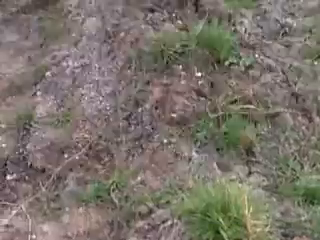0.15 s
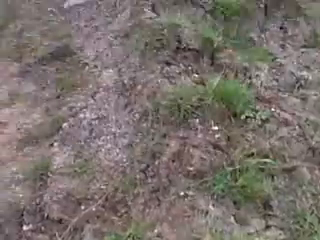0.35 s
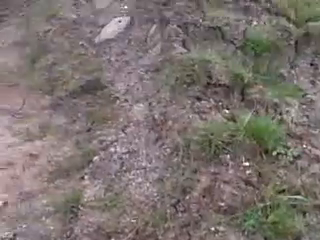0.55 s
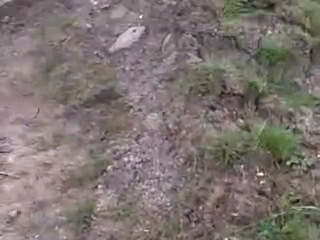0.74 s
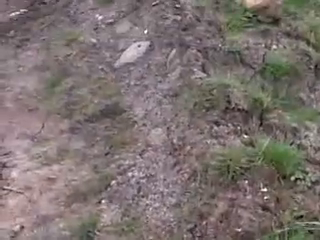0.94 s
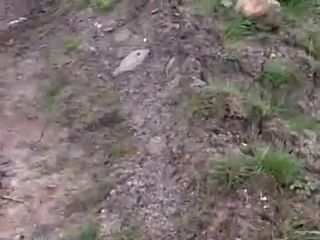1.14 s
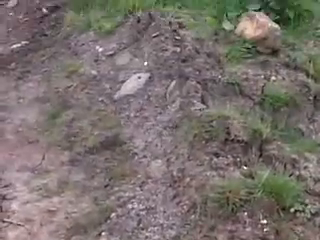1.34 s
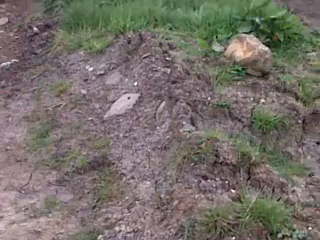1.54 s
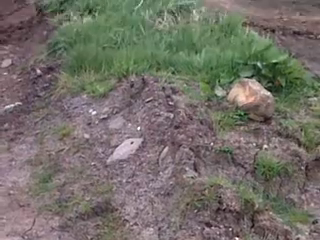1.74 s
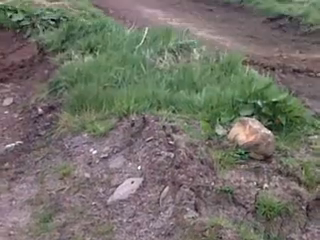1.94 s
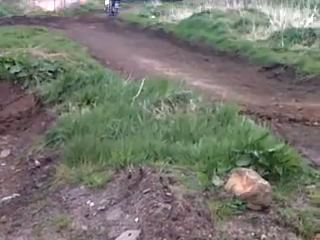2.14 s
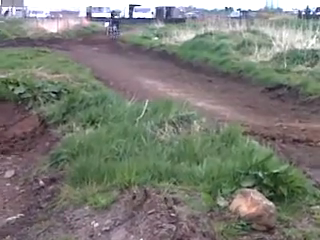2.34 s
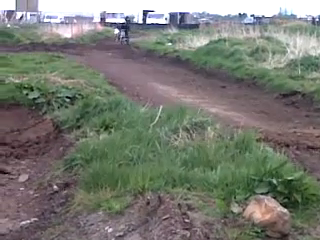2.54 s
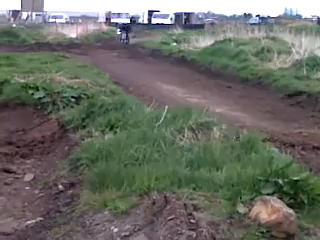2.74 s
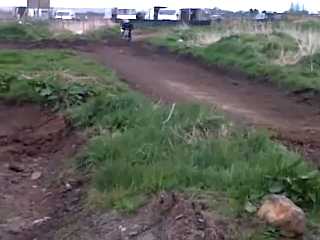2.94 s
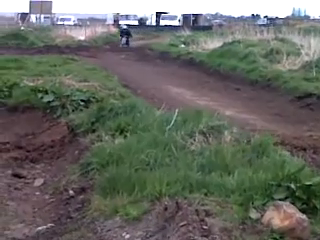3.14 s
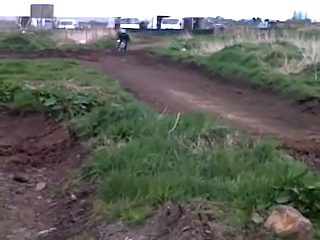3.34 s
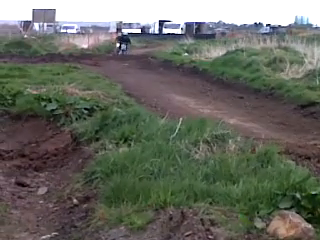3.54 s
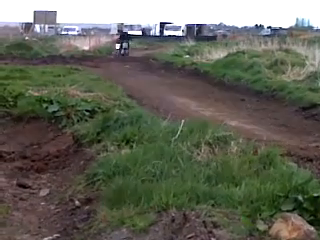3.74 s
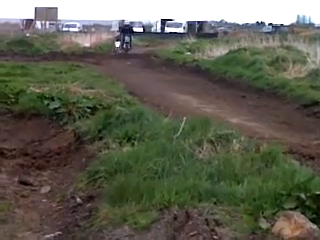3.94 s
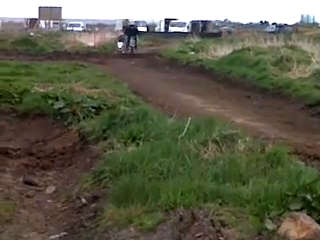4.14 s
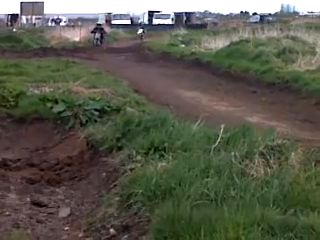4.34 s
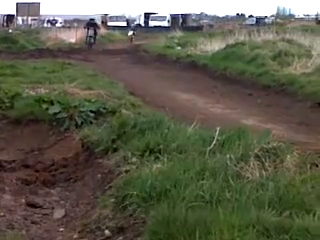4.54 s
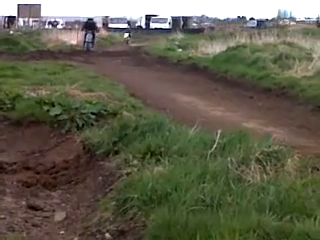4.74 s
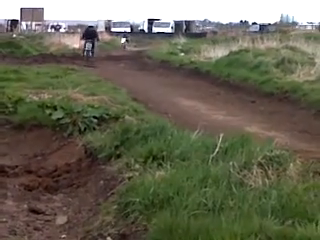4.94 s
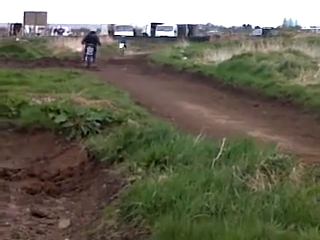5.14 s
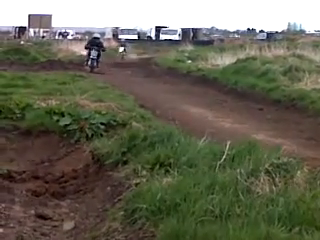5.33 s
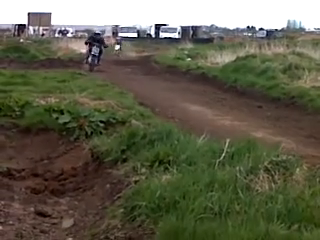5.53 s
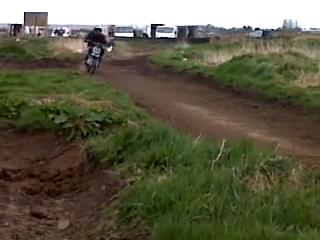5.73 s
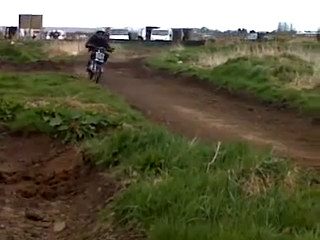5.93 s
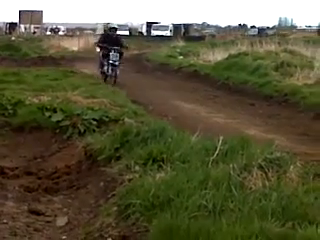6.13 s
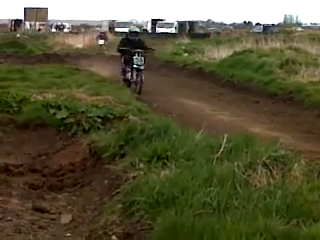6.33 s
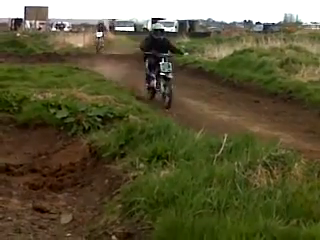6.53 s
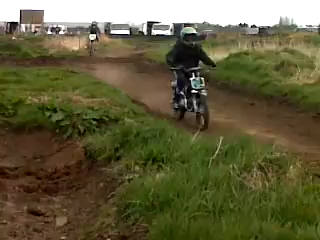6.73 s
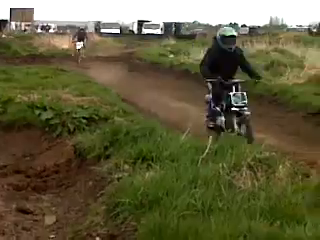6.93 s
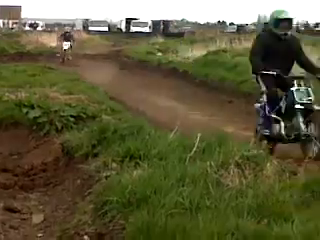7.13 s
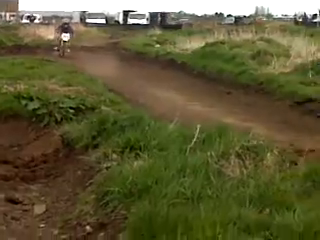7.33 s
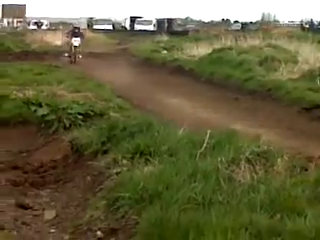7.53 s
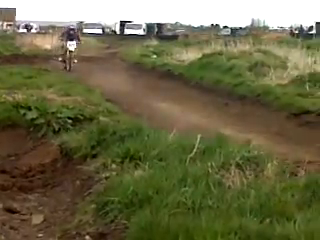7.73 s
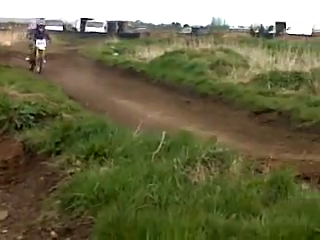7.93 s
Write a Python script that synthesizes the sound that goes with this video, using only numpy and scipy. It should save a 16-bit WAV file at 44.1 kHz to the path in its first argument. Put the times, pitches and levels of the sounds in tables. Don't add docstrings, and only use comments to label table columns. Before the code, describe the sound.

Small dirt bikes on an open track: a four-stroke revs up and down, a two-stroke whines and misfires, then the four-stroke roars up close.

```python
import sys
import numpy as np
from scipy import signal
from scipy.fft import rfft, irfft
from scipy.io import wavfile
from scipy.ndimage import uniform_filter1d

SR = 44100
rng = np.random.default_rng(int(sys.argv[2]) if len(sys.argv) > 2 else 0)


def voltage_ratio(decibels):
    exponent = np.asarray(decibels, float) / 20
    return 10 ** exponent


def generate_wav(sig):
    pcm = np.round(np.clip(np.atleast_2d(sig).T, -1, 1) * 32767).astype(np.int16)
    wavfile.write(sys.argv[1], SR, pcm)


N = 351017
T = np.arange(N) / SR

SPLITS_HZ = [330, 950, 2000, 3800]
RASP_LAG_S = .0012
JUMP_S = 4.3842


def rms_one(x):
    return x / np.sqrt(np.mean(x ** 2) + 1e-20)


def in_time(rows, fade=0.068):
    s, *columns = np.transpose(rows)
    gate = np.clip(np.minimum(T - s[0] + fade, s[-1] + fade - T) / fade, 0, 1)
    return [np.interp(T, s, c) for c in columns] + [gate]


def colour(x, points):
    size = 8192
    hz, db = np.transpose(points)
    bins_hz = np.arange(size // 2 + 1) * SR / size
    wanted = np.interp(np.log(bins_hz + 1), np.log(hz), db, left=db.min() - 12.5, right=db.min() - 17.0)
    cepstrum = irfft(wanted * np.log(10) / 20)
    cepstrum[1:size // 2] *= 2
    cepstrum[size // 2 + 1:] = 0
    impulse = irfft(np.exp(rfft(cepstrum)))
    return rms_one(signal.fftconvolve(x, impulse)[:N])


def drift(rate):
    count = int(N / SR * rate * 2) + 2
    return np.interp(np.linspace(0, count - 1, N), np.arange(count), rng.standard_normal(count))


def ring(clicks, hz, t60):
    r, w = voltage_ratio(-60 / (t60 * SR)), 2 * np.pi * hz / SR
    return signal.lfilter([0, np.sin(w)], [1, -2 * r * np.cos(w), r * r], clicks + 1e-18)


def firings(per_s, wobble, spread_db):
    turns = np.cumsum(per_s) / SR
    turns = turns - turns[int(7.641 * SR)] + wobble * drift(25)
    fired = np.diff(np.floor(np.maximum.accumulate(turns)), prepend=np.floor(turns[0])) > 0
    strength = voltage_ratio(spread_db * rng.standard_normal(N))
    return turns % 1, fired * strength / np.sqrt(per_s)


def clicks_at(rows):
    out = np.zeros(N)
    for s, db in rows:
        out[round(s * SR)] = voltage_ratio(db)
    return out


def field():
    # f/Hz, level/dB
    roar = [(15, -33), (25, -29.5), (59, -14), (114, 0), (199, -0.5), (290, -9), (411, -20), (557, -28),
            (1020, -14.5), (1670, -27.5), (2150, -32), (3770, -44), (6600, -57.5), (8580, -86),
            (14500, -120)]
    # t/s, level/dB
    roar_db = [(0.0, -31), (3.5, -31.5), (4.6, -27.5), (5.14, -24.5), (7.0, -24), (7.67, -21),
               (7.96, -16.5)]
    return voltage_ratio(in_time(roar_db)[0] - 7.5 + 2.0 * drift(14)) * colour(rng.standard_normal(N), roar)


def grip():
    # opens t/s, firing rate f/Hz, shuts t/s, firing rate f/Hz, throttle/0-1
    revs = [(0.132, 31.5, 0.49, 34.6, 0), (0.62, 33.8, 0.93, 37.2, .2), (0.969, 37.5, 1.44, 43.2, 0.1),
            (1.48, 44.1, 1.69, 52.8, 0.3), (1.82, 53.5, 2.2, 63.6, 0.5), (2.46, 52, 2.77, 49.5, .3),
            (3.03, 42.4, 3.27, 58, 0.9), (3.29, 58.2, 3.58, 64.6, 0.98), (3.87, 48.5, 4.38, 63.6, 0.77),
            (4.42, 43.5, 4.64, 43, 0.2), (4.88, 40.4, 5.16, 44.9, 0.2), (5.45, 46.3, 5.96, 52.8, 0.44),
            (6.12, 52.9, 6.4, 56.3, 0.5), (6.44, 56.2, 6.62, 55.6, 0.6), (6.84, 49, 6.97, 48.9, 0.1),
            (7.04, 48.6, 7.23, 54.6, 0.5), (7.51, 48.5, 7.925, 59.7, 0.54)]
    idle_per_s, last_per_s = 57, 46
    fall_bend, flywheel_s = 1.6, .04
    open_s, shut_s = 0.014, 0.14
    opens, low, shuts, high, depth = np.transpose(revs)
    s = np.concatenate([[0], np.ravel([opens, shuts], "F"), [N / SR]])
    per_s = np.concatenate([[idle_per_s], np.ravel([low, high], "F"), [last_per_s]])
    place = np.interp(T, s, np.arange(len(s) - 1e-6)).clip(0, len(s) - 1.000001)
    k, part = place.astype(int), place % 1
    part = np.where(k % 2, part, 1 - (1 - part) ** fall_bend)
    speed = per_s[k] + part * np.diff(per_s)[k]
    speed = uniform_filter1d(speed, size=int(flywheel_s * SR), mode="nearest")
    twists = []
    for a, b, d in zip(opens, shuts, depth):
        opening, shutting = (T - a) / open_s + .5, (b - T) / shut_s + 1
        twists.append(d * np.clip(np.minimum(opening, shutting), 0, 1))
    return speed, np.clip(np.max(twists, axis=0), 0, 1)


def split(x):
    octaves = np.log2(np.arange(N // 2 + 1) * SR / N + 1)
    above = [np.clip((octaves - np.log2(hz)) * 3 + .5, 0, 1) for hz in SPLITS_HZ]
    whole = rfft(x)
    return [rms_one(irfft(whole * (a - b), N)) for a, b in zip([1] + above, above + [0])]


def booms(pulses):
    # start t/s, end t/s, f/Hz, t60/s, level/dB
    pipe_notes = [(3.25, 3.68, 586, 0.033, -46.5), (5.6, 5.998, 319.5, 0.048, -44),
                  (6.72, 7.08, 184, 0.063, -32), (7.15, 7.14, 630, 0.024, -39.5),
                  (7.2, 7.55, 374, 0.03, -35), (7.57, 7.84, 720, 0.058, -37),
                  (7.7, 7.96, 397, 0.095, -28.5), (7.5, 7.96, 120, 0.17, -34.5),
                  (7.72, 8.2, 245, 0.043, -32.5), (7.84, 7.9, 1270, 0.01, -34),
                  (6.24, 6.64, 3180, 0.004, -48), (6.7, 6.9, 2200, .005, -58),
                  (7.23, 7.33, 2750, .003, -42), (7.08, 7.14, 2880, 0.0036, -45),
                  (1.55, 2.35, 121, .09, -43.5), (3.1, 3.6, 121.4, .09, -44), (4.44, 5.1, 140, 0.063, -41),
                  (3.8, 4.1, 610, 0.036, -53), (1.47, 1.79, 278, .05, -43.5), (4.45, 4.8, 700, 0.014, -51),
                  (7.6, 7.6, 1880, 0.0077, -40)]
    out = np.zeros(N)
    for a, b, hz, t60, db in pipe_notes:
        high = hz > SPLITS_HZ[1]
        struck = np.roll(pulses, int(RASP_LAG_S * SR) * high) * voltage_ratio((1 + 2 * high) * drift(40))
        if high:
            struck = ring(struck, hz, t60)
        no_thump = signal.butter(4, hz / 2, "high", fs=SR, output="sos")
        note = signal.sosfilt(no_thump, ring(struck, hz, t60))
        out -= voltage_ratio(db) * rms_one(note) * in_time([(a, 0), (b, 0)], fade=.04)[-1]
    return out


def near_bike():
    # f/Hz, level/dB
    exhaust = [(25, -42.5), (78, -17.5), (106, 1.5), (230, -2), (380, -11.5), (480, -18), (720, -12),
               (1000, -18), (1750, -18.5), (2080, -26), (2600, -22), (3400, -31), (3900, -50),
               (5400, -51.5), (6900, -76.5)]
    # t/s, level/dB
    nearness = [(0, -25.5), (.75, -23), (1.3, -9.5), (2.5, -13), (4.3, -11.5), (5.3, -12), (6.0, -5.5),
                (6.8, -1.5), (7.5, 0), (7.96, 0.5)]
    # t/s, level/dB
    shadow = [(0, -1), (1.3, -15), (2.2, -10.5), (2.5, -5.5), (2.9, -14), (3.4, -15), (4.3, -10),
              (5.0, -7.5), (5.8, -6), (6.4, -8.5), (6.85, -13.5), (7.05, -11.5), (7.3, -3.5), (7.55, -5),
              (7.8, 2), (7.96, -2)]
    # level close by/dB, share of nearness, share of shadow, full-throttle gain/dB
    layers = [(-21.5, 0.91, 0.051, 2), (-31, 0.72, 0.87, 10.5), (-29.5, 0.62, 0.87, -0.5),
              (-40, 0.92, 0.72, 3)]
    # t/s, level/dB
    facing = [(0, -5.5), (4.3, 2.5), (4.5, -9), (5.9, -4), (6.2, 2), (6.65, -2), (6.7, 2), (7.03, -2.5),
              (7.27, 2), (7.45, -4.5), (7.96, -3)]
    # t/s, extra path/ms
    bounce = [(0, 0.52), (4.4, 0.88), (6.1, 0.29), (6.66, 0.34), (6.69, 0.39), (7.05, 0.39), (7.3, 0.4),
              (7.96, 0.4)]
    speed, throttle = grip()
    near_db, shadow_db, facing_db = in_time(nearness)[0], in_time(shadow)[0], in_time(facing)[0]
    thump_db, bark_db, rasp_db, crack_db = (
        db + share * near_db + shade * shadow_db + gain_db * throttle for db, share, shade, gain_db in layers)

    sharp = np.clip(.12 + .58 * throttle + np.interp(T, [6.0, 7.3], [0, .75]), 0, .95)
    phase, pulses = firings(speed, wobble=.006, spread_db=1.7)
    puff = 1 + 2.5 * sharp * np.exp(-phase / .3)
    out = booms(pulses)
    rebound = .92
    pulses = signal.lfilter([rebound, -1], [1, -rebound], pulses)
    blasts = split(colour(pulses, exhaust))
    uneven = np.roll(pulses * voltage_ratio(2.5 * drift(40)), int(RASP_LAG_S * SR))
    blasts[2:] = split(colour(-uneven, exhaust))[2:]
    gases = split(colour(puff * rng.standard_normal(N), exhaust))

    late = np.interp(np.arange(N) - in_time(bounce)[0] * SR / 1000, np.arange(N), blasts[3])
    blasts[3] = rms_one(blasts[3] + .85 * late)
    blasts[2] = rms_one(blasts[2] + .7 * np.roll(blasts[2], int(.00118 * SR)))
    far = np.interp(T, [4.4, 5.6], [.8, 0])
    dull = rms_one(signal.sosfilt(signal.butter(4, 700, fs=SR, output="sos"), blasts[1]))
    blasts[1] = far * dull + (1 - far) * blasts[1]
    hidden = np.interp(T, [1.4, 1.55], [.8, 0])
    thump_top = signal.sosfiltfilt(signal.butter(3, 235, "high", fs=SR, output="sos"), blasts[0])
    blasts[0] = blasts[0] - hidden * thump_top

    near = np.interp(T, [4.5, 6.1], [.3, 1])
    near = near * np.clip(voltage_ratio(facing_db), 0, 1)
    shares = (.97, sharp, .78 * sharp ** 1.5, np.sqrt(sharp) * near, .12 * sharp * near)
    thump_db = uniform_filter1d(thump_db, size=4000)
    bark_db = bark_db + np.interp(T, [7.5, 7.07], [-2.5, 0])
    crack_db = np.minimum(crack_db + facing_db - .6, rasp_db - 2)
    levels_db = (thump_db - 3.0, bark_db, rasp_db - .6, crack_db, 0.53 * crack_db - 41.0)
    for blast, gas, share, level_db in zip(blasts, gases, shares, levels_db):
        mixed = np.sqrt(share) * blast + np.sqrt(1 - share) * gas
        out += voltage_ratio(level_db + 1.4 * drift(9)) * mixed
    return out


def far_bike():
    # t/s, firing rate f/Hz, level/dB
    passes = [
        [(0.0, 65.3, -50), (0.1, 65.5, -45), (0.2, 66.5, -39), (0.36, 68.5, -44.5), (0.47, 69.2, -45.5),
         (0.63, 65.5, -45.5), (0.72, 60, -42.5), (0.86, 60, -43), (0.95, 58, -54)],
    ]
    # f/Hz, level/dB
    thump = [(24, -43.5), (70, -18), (125, 0.5), (208, 0.5), (285, -3), (332, -11.5), (450, -22.5),
             (580, -33), (990, -120)]
    # t/s, f/Hz, level/dB
    notes = [
        [(2.35, 235.4, -39), (2.396, 243.4, -34), (2.456, 257.6, -31), (2.546, 330.6, -39.5),
         (2.718, 289.8, -45), (2.79, 302.2, -35), (2.886, 268, -53), (2.92, 272, -42)],
        [(3.62, 184.5, -44), (3.71, 209.7, -30.5), (3.728, 203, -46), (3.752, 211, -25), (3.768, 220.3, -36),
         (3.92, 189, -38)],
        [(.11, 203.4, -46), (.16, 222.7, -43), (.24, 252, -52)],
        [(.18, 275, -54), (.23, 295, -49), (.3, 313, -54)],
        [(.78, 199.7, -54), (.84, 229, -47), (.92, 258, -52)],
        [(1.0, 264.6, -52), (1.05, 278, -42), (1.12, 300, -54)],
        [(1.05, 152.2, -44), (1.15, 149, -39), (1.2, 152, -48)],
        [(1.95, 313, -47), (1.968, 330.3, -52.5), (2.002, 302.8, -38.5), (2.136, 311, -39.5), (2.15, 335, -52)],
    ]
    out = np.zeros(N)
    for rows in passes:
        per_s, thump_db, gate = in_time(rows)
        pulses = firings(per_s, wobble=.006, spread_db=1.5)[1]
        out += gate * voltage_ratio(thump_db + 1) * colour(pulses, thump)
    for rows in notes:
        hz, note_db, gate = in_time(rows)
        out += gate * voltage_ratio(note_db - 1.0 + 1.7 * drift(30)) * np.sin(2 * np.pi * np.cumsum(hz) / SR)
    return out


def grit():
    # t/s, level/dB (peak)
    ticks = [(0.0478, -49), (0.103, -43), (0.1321, -40), (0.1585, -39), (0.209, -42), (0.2748, -56),
             (0.7084, -56.5), (0.7335, -42), (0.754, -42), (0.7737, -41), (0.7946, -38), (0.812, -45),
             (0.8306, -40), (.839, -43.5), (0.8654, -41), (0.8868, -44)]
    # t/s, level/dB (peak)
    scuffs = [(1.262, -56), (1.3154, -48), (1.3458, -51), (1.3753, -45), (1.4036, -49.5), (1.5189, -43),
              (1.9097, -48), (1.9315, -41.5), (1.96, -36)]
    burst = signal.lfilter([1], [1, -.99], clicks_at(ticks + scuffs)) * rng.standard_normal(N)
    low = voltage_ratio(-19.0) * ring(burst, 2820, 0.005) + voltage_ratio(-31.0) * ring(burst, 2900, 0.0033)
    return low + voltage_ratio(-32.0) * ring(burst, 5400, 0.0054)


def putter():
    # t/s, firing rate f/Hz, level/dB
    run = [(.97, 62, -52.5), (1.08, 68, -52), (1.16, 74, -46.5), (1.27, 73, -55.5), (1.36, 71, -51)]
    hz, t60_s = 1737, 0.0062
    per_s, db, gate = in_time(run)
    pulses = firings(per_s, wobble=.02, spread_db=2)[1]
    return gate * voltage_ratio(db) * rms_one(ring(ring(pulses, hz, t60_s), hz, t60_s))


def hand():
    # t/s, length/s, start f/Hz, end f/Hz, level/dB
    squeaks = [(3.527, 0.021, 1460, 1390, -33.5), (4.175, 0.042, 1333, 1264, -35),
               (4.217, 0.03, 1244, 1250, -29.5), (4.299, 0.051, 1383, 1314, -27.5)]
    # t/s, level/dB (peak), ring f/Hz, t60/s, snap level/dB
    case_clicks = [
        (1.493, -19, 770, 0.014, -40),
        (4.376, -9, 1540, 0.0078, -5.5),
        (4.38, -17, 614, 0.031, -30),
        (4.4, -28, 40, 0.074, -31),
    ]
    out = np.zeros(N)
    for s, length, start_hz, end_hz, db in squeaks:
        size, start = int(length * SR), int(s * SR)
        swell = np.linspace(.2, 1, size) ** 0.81 * np.minimum(1, np.arange(size)[::-1] / 200)
        turns = np.cumsum(np.linspace(start_hz, end_hz, size)) / SR
        out[start:start + size] += voltage_ratio(db) * swell * np.sin(2 * np.pi * turns)
    for s, db, hz, t60, snap_db in case_clicks:
        click = signal.sosfilt(signal.butter(4, 5400, fs=SR, output="sos"), clicks_at([(s, db)]))
        snap = ring(click, 2800, 0.003) + ring(click, 4800, 0.011) * voltage_ratio(-26.5)
        snap += ring(click, 4500, 0.003) * voltage_ratio(-12.0) + ring(click, 2150, 0.003) * voltage_ratio(-4.0)
        out -= ring(click, hz, t60) + voltage_ratio(snap_db) * snap - ring(click, 280, 0.011) * voltage_ratio(-8.0)
    return out


def whistles():
    # start t/s, end t/s, f/Hz, width f/Hz, level/dB
    bands = [(7.62, 7.8, 2700, 350, -50), (7.6, 7.9, 1900, 500, -43), (1.85, 2.0, 2700, 1200, -60),
             (4.85, 5.15, 5800, 300, -77), (5.1, 5.2, 3950, 200, -70), (3.1, 3.5, 5300, 150, -75),
             (4.9, 5.17, 5200, 250, -69), (2.35, 2.75, 5950, 150, -78), (6.0, 6.2, 5400, 400, -66)]
    out, white = np.zeros(N), rng.standard_normal(N)
    for start, end, hz, width_hz, db in bands:
        edges_hz = [hz - width_hz / 2, hz + width_hz / 2]
        band = signal.sosfilt(signal.butter(2, edges_hz, "band", fs=SR, output="sos"), white)
        out += voltage_ratio(db) * rms_one(band) * in_time([(start, 0), (end, 0)], fade=0.15)[-1]
    return out


def two_stroke():
    # t/s, firing rate f/Hz, effort level/dB
    pulls = [
        [(2.05, 156.4, -5), (2.15, 163, -6), (2.45, 168.6, -3.5), (2.78, 163.9, -4.5), (3.0, 163.5, -2.5),
         (3.14, 168, -1.5), (3.45, 166.2, -3), (3.59, 168.8, -0.5), (4.38, 167.2, -1)],
        [(4.42, 167.7, -13), (4.51, 168.6, -8.5), (4.96, 162.7, 0), (5.15, 160.6, -2.5), (5.3, 155, -10.5),
         (5.47, 144, -0.5), (5.57, 141, -27), (5.66, 151, -29), (5.8, 152, -31)],
        [(5.87, 153, -4), (5.952, 160.9, -4), (6.098, 173.6, 1.5), (6.25, 172.5, 0.5), (6.464, 164.6, 1),
         (6.55, 158.8, -31)],
        [(6.64, 149.3, -3.5), (6.738, 166.0, 2.5), (6.772, 166.0, -3), (6.82, 174.1, -18)],
    ]
    # hum, buzz, sing, whine level/dB
    headings = [(-37.5, -54, -48.5, -50.5), (-34, -53, -70, -59), (-35.5, -44, -47, -47),
                (-31.5, -58, -65, -52)]
    # multiple, level/dB
    buzz = [(3, -.5), (4, 0), (2, -3.5)]
    # multiple, level/dB
    sing = [(7, -2), (9, -5.5), (11, -8.5), (13, -20), (14, -25), (16, -26.5)]
    # start t/s, end t/s, multiple, level/dB
    swells = [(2.15, 2.9, 13, -64), (2.2, 2.7, 15, -69), (2.15, 3.15, 16, -68.5), (2.23, 2.75, 14, -65.5),
              (2.27, 2.55, 24, -68), (2.6, 3.0, 25, -69.5), (2.85, 3.35, 9, -53.5), (2.85, 3.3, 32, -74.5),
              (3.4, 4.1, 14, -63), (3.6, 4.2, 16, -65), (3.63, 4.2, 11, -52.5), (3.55, 4.1, 13, -63),
              (6.1, 5.5, 17, -61), (6.1, 6.42, 13, -56), (6.05, 6.45, 9, -50), (6.05, 6.4, 11, -55),
              (6.66, 6.77, 4, -42), (5.4, 5.15, 32, -72), (3.5, 4.2, 21, -70), (3.35, 3.7, 25, -74),
              (3.0, 3.38, 11, -57)]
    # f/Hz, level/dB
    whine_points = [(800, -43), (1000, -14.5), (1500, 14.5), (2000, 2.5), (2250, 0.5), (2700, -1.5),
                    (3100, -3), (3600, -9.5), (4200, -14), (5200, -13), (6600, -41)]
    hum_follows, sing_follows, whine_follows = 0.14, 2.4, 0.18
    out = np.zeros(N)
    for rows, (hum_db, buzz_db, sing_db, whine_db) in zip(pulls, headings):
        per_s, effort_db, gate = in_time(rows, fade=0.016)
        phase, pulses = firings(per_s, wobble=.0015, spread_db=.5)
        angle = 2 * np.pi * phase
        tones = voltage_ratio(hum_db + hum_follows * effort_db + 2.6 * drift(10)) * np.sin(angle)
        for level_db, orders in ((buzz_db + effort_db, buzz), (sing_db + sing_follows * effort_db, sing)):
            for order, db in orders:
                tones += voltage_ratio(level_db + db + 3.5 * drift(6)) * np.sin(order * angle)
        for a, b, order, db in swells:
            if rows[0][0] < a < rows[-1][0]:
                swell = in_time([(a, 0), (b, 0)], fade=.05)[-1]
                tones += voltage_ratio(db + 2.8 * drift(9.1)) * swell * np.sin(round(order) * angle)
        whine = colour(pulses, whine_points)
        lag = SR * (0.001556 + 0.00018 * drift(1.2))
        whine = whine + 0.89 * np.interp(np.arange(N) - lag, np.arange(N), whine)
        whine_amp = voltage_ratio(whine_db + whine_follows * effort_db)
        out += gate * (np.sqrt(2) * tones + whine_amp * whine)
    return out


def misfires():
    # t/s, level/dB (peak)
    pops = [(5.1826, -54), (5.237, -54), (5.3014, -51), (5.3617, -74), (5.4046, -57), (5.453, -50),
            (5.502, -53), (5.5613, -48), (5.6047, -45), (5.67, -47), (5.7574, -45), (5.8204, -47.5),
            (5.901, -46), (5.9569, -47), (6.0107, -47.5)]
    # f/Hz, level/dB, t60/s
    modes = [(3870, 5, 0.018), (3140, 11, 0.01), (2560, 1, .006), (1680, 8, 0.01), (5300, -18, .006)]
    decay = signal.lfilter([1], [1, -.9975], clicks_at(pops))
    burst = signal.lfilter([.01], [1, -.99], decay) * rng.standard_normal(N)
    return sum(voltage_ratio(db - 23) * ring(burst, hz, t60) for hz, db, t60 in modes)


def scene():
    engines = near_bike() + far_bike() + putter() + two_stroke() + misfires()
    return (field() + engines + grit() + hand() + whistles())[None]


def starved(x, limit_db, swing_db):
    beat_s, beat_at_s, beat_slip_s = .1287, .153, .055
    hz, s, cells = signal.stft(x, SR, nperseg=1024)
    band = np.arange(len(hz)) // 7 * 7
    power = uniform_filter1d(np.abs(cells) ** 2, size=7, axis=0)[band]
    loudness = uniform_filter1d(np.sum(np.abs(cells) ** 2, axis=0), size=20)
    swing = np.cos(2 * np.pi * (s - beat_at_s - beat_slip_s * (s > JUMP_S)) / beat_s)
    beat = np.tanh(4 * swing - .7 - 1.5 * (s > 2.2))
    luck = 4.5 * rng.standard_normal(cells.shape)[band] - 3.5 * (hz[:, None] / 1000 - 4.5)
    limit = loudness ** .55 * voltage_ratio(limit_db + swing_db * beat + luck) ** 2
    dropped = (power < limit) & (hz[:, None] > 3300)
    busy = ((s > 5.9) & (s < 6.55)) | ((s > 7.05) & (s < 8.0))
    dropped |= busy & (hz[:, None] > 6200) & (luck < -2)
    return signal.istft(cells * ~dropped, SR, nperseg=1024)[1][..., :N]


def low_pass(x):
    return signal.sosfilt(signal.butter(12, 7900, fs=SR, output="sos"), x)


def record(dry):
    dull = signal.sosfilt(signal.cheby2(8, 30, 7000, fs=SR, output="sos"), np.tanh(dry))
    thin = starved(dull[0], limit_db=-81.5, swing_db=13.0)
    step = signal.lfilter([1], [1, -.96], clicks_at([(JUMP_S, -20)]))
    step = signal.sosfilt(signal.butter(4, 6500, fs=SR, output="sos"), step)
    return low_pass((thin - step)[None])


dry = scene()
out = record(dry)
generate_wav(out)
```